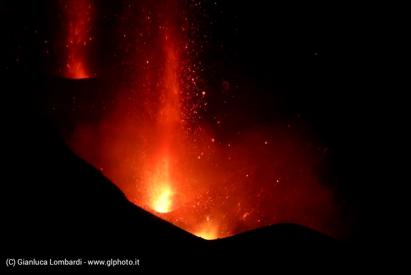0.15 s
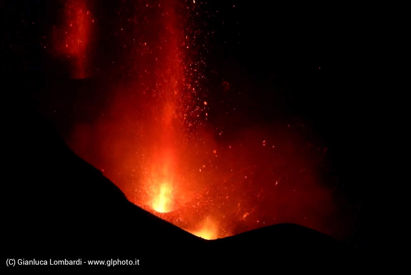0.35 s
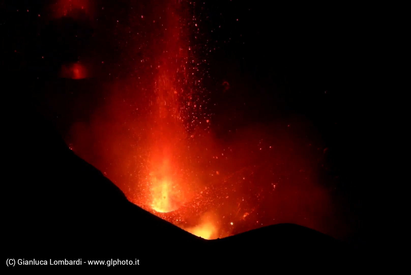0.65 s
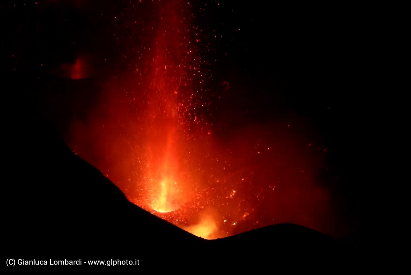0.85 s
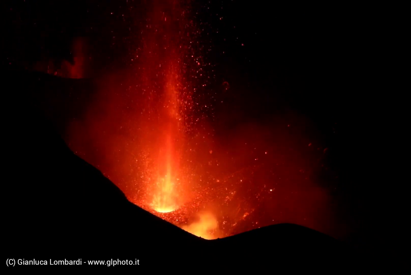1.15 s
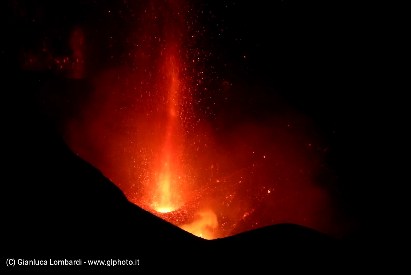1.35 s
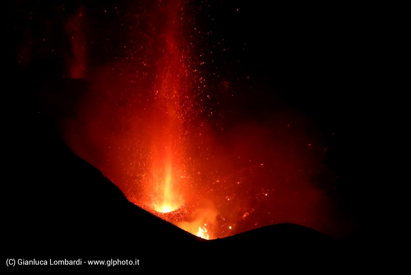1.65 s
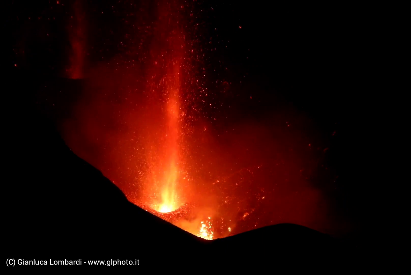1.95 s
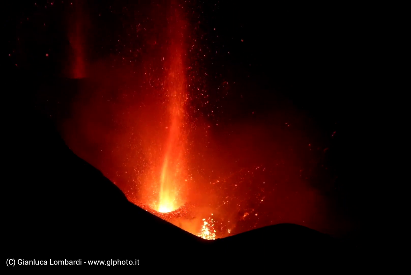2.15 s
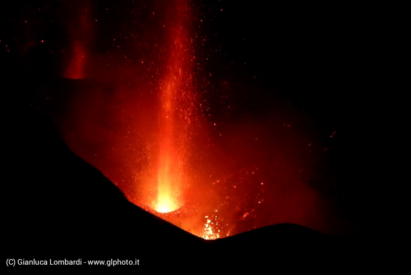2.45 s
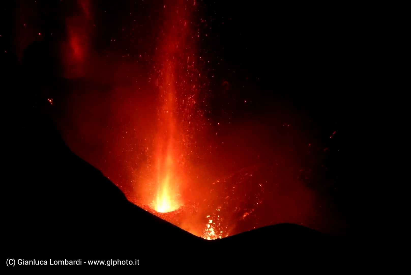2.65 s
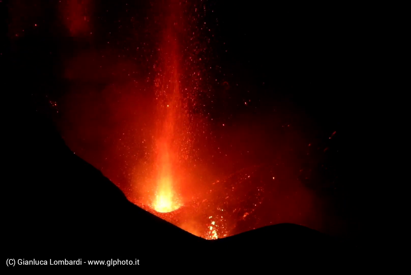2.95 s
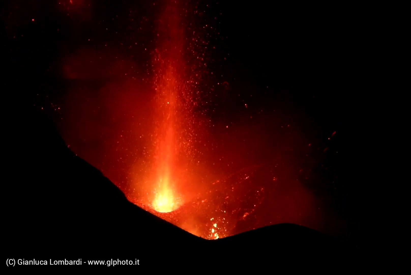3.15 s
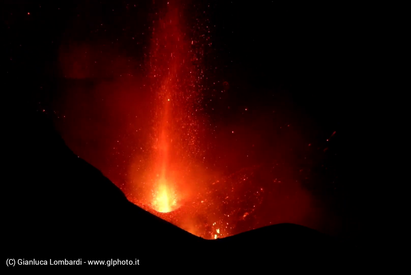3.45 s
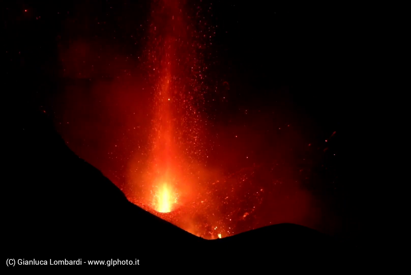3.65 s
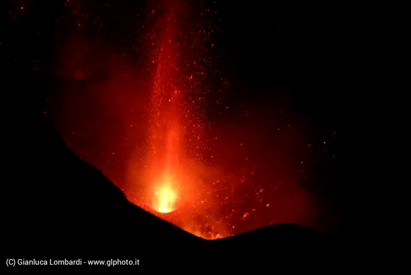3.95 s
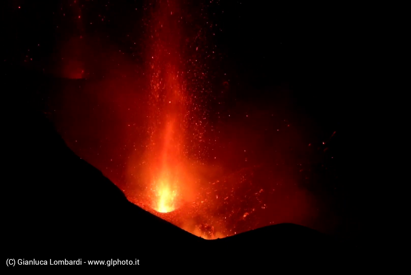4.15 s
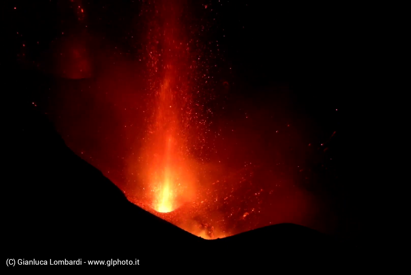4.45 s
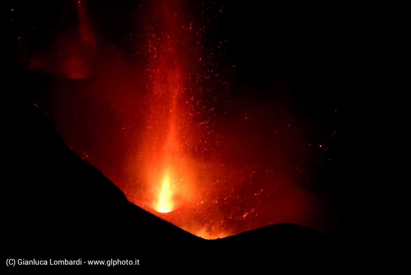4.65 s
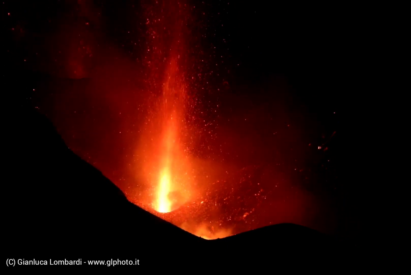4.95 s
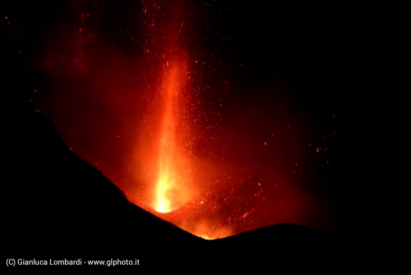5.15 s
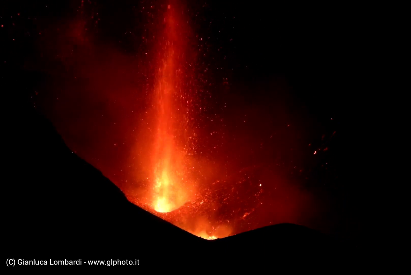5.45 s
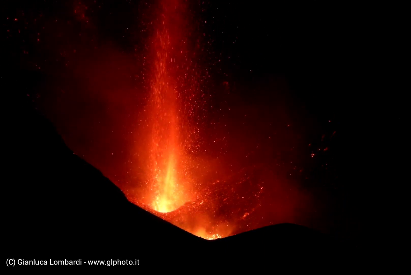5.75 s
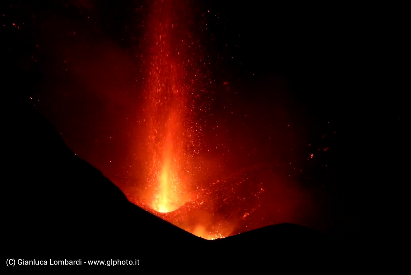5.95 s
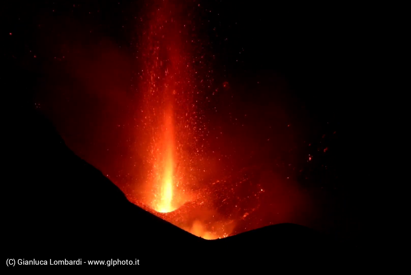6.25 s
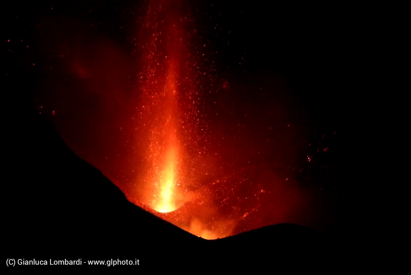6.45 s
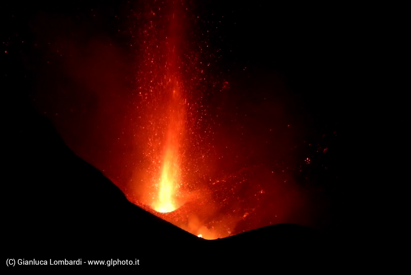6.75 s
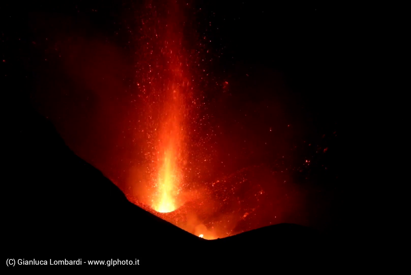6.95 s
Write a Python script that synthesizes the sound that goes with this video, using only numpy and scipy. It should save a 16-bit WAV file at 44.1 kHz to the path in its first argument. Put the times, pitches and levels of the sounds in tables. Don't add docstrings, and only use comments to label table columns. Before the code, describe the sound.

Outdoors at night, a distant volcanic vent jets gas in a continuous, dull, low roar. It starts subdued with a couple of soft bass thumps, then swells after about two seconds into a stronger, uneven rumble with rapid puffs. A faint steady hiss lies beneath. Close to the microphone, rare tiny ticks give way after five seconds to crisp, quiet crunching of sliding cinders.

```python
import sys
import numpy as np
from scipy import signal
from scipy.fft import rfft, irfft, next_fast_len
from scipy.io import wavfile
from scipy.ndimage import uniform_filter1d, map_coordinates

SR = 44100
rng = np.random.default_rng(int(sys.argv[2]) if len(sys.argv) > 2 else 0)


def how_loud(loudness_db):
    steps = np.asarray(loudness_db, float) / 20
    return 10 ** steps


def inscribe(sig):
    pcm = np.round(np.clip(np.atleast_2d(sig).T, -1, 1) * 32767)
    wavfile.write(sys.argv[1], SR, pcm.astype(np.int16))


N = 313992
ENVELOPE_S = np.arange(0, N + 32, 32) / SR


def unit(x):
    return x / np.sqrt(np.mean(x ** 2) + 1e-20)


def along(points, hz):
    point_hz, value = np.transpose(points)
    return np.interp(np.log(hz + 1), np.log(point_hz + 1), value)


def curves(rows):
    time_s, *columns = np.transpose(rows)
    return [np.interp(np.arange(N) / SR, time_s, column) for column in columns]


def wobble(rate_hz):
    return map_coordinates(rng.standard_normal(N // 100), [np.arange(N) * rate_hz / SR])


def swells(rows, half_width_s):
    total_db = sum(db * np.exp(-.5 * ((ENVELOPE_S - peak_s) / half_width_s) ** 2) for peak_s, db in rows)
    return curves(np.transpose([ENVELOPE_S, total_db]))[0]


def filtered(x, response):
    size = next_fast_len(N + 8192)
    return irfft(rfft(x, size) * response(np.fft.rfftfreq(size, 1 / SR)), size)[:N]


def above(hz, edge_hz):
    return 1 / (1 + (edge_hz / (hz + 1)) ** 8)


def path_gain(hz):
    # hz, density_db
    path = [(12, -23), (28, -21.5), (45, -13), (62, -4.5), (478, -8), (540, -7), (868, -11), (1080, -14),
            (1220, -12.5), (2030, -23), (2520, -31.5), (3250, -47.5), (4000, -68.5), (6000, -100)]
    # centre_hz, width_hz, ridge_db
    ridges = [(79.5, 7.5, 4), (113.8, 30, 4.5), (174.8, 32, 4.5), (223.2, 43, 8.5), (288, 45.5, 4.5),
              (349.3, 46, 6), (404, 34, 4)]
    ridges_db = sum(db * np.exp(-np.log(2) * (2 * (hz - centre_hz) / width_hz) ** 2)
                    for centre_hz, width_hz, db in ridges)
    return how_loud(along(path, hz) + ridges_db)


def turbulence(patchy_db):
    z = signal.stft(rng.standard_normal(N + SR), nperseg=1024)[2]
    field = uniform_filter1d(rng.standard_normal(z.shape), size=7, axis=0)
    field = uniform_filter1d(field, size=6, axis=1)
    return signal.istft(z * how_loud(patchy_db * unit(field)), nperseg=1024)[1][:N]


def eddies(share, patchy_db, flutter_db):
    sound = filtered(turbulence(patchy_db), lambda hz: path_gain(hz) * np.sqrt(share(hz)))
    return unit(sound * how_loud(flutter_db * wobble(18)))


def jet():
    handover_hz = [150, 550, 1400]
    # time_s, thrust_db, jet_speed (-1..1)
    thrust = [(0.0, -40, -1), (0.6, -38, 0.19), (1.2, -37.5, -0.27), (1.6, -34, -1.05), (2.4, -31, -1.16),
              (2.9, -29, -1.1), (3.3, -30, -0.94), (3.6, -27, -0.34), (4.6, -26, -0.41), (5.2, -26.5, 0.1),
              (6.2, -27.5, 0.94), (6.7, -26, 1), (7.12, -28, .4)]
    # peak_s, swell_db, brightness (-1 roar .. 1 edge)
    puffs = [(0.17, 1.5, 0.42), (0.58, 1, 0.16), (1.05, 1.2, 0.99), (1.48, 0.9, 1), (1.73, -0.2, -.3),
             (1.85, 0.8, -1.3), (2.17, 1, 0.25), (2.36, 1.3, -1.1), (2.5, 2.1, -0.61), (2.68, 1.5, -.8),
             (2.9, 2, 0.036), (3.05, 3, -0.22), (3.52, 3, -0.51), (3.61, 1.5, .4), (3.74, 0.5, -0.092),
             (3.93, 3, .1), (4.24, 3, -0.63), (4.42, 1.1, -.8), (4.61, 3, -0.56), (4.86, 1.7, -.2),
             (5.04, 3.5, -.1), (5.211, 0.75, -1.2), (5.33, 1.6, -0.57), (5.57, 2.2, 0.12),
             (5.98, 2.5, 0.74), (6.28, 0.8, 0.42), (6.46, 1.5, -0.86), (6.82, 3, -0.38), (6.92, 3.5, 0.37)]
    # peak_s, swell_db
    slugs = [(0.47, 8), (0.62, 11), (0.85, 4), (1.0, -4), (1.95, 1), (2.7, 4), (2.95, 1.5), (3.28, -4),
             (3.42, 6.5), (3.55, 5), (4.15, 2.5), (4.4, 0.5), (4.65, 1.5), (4.86, 4.5), (5.3, 1.5),
             (5.55, 2.5), (6.42, -5), (6.8, 4), (7.02, 7.5)]

    def puff_db(side):
        rows = [(peak_s, db * (1 + side * bright)) for peak_s, db, bright in puffs]
        return swells(rows, half_width_s=0.048)

    low_hz, mid_hz, high_hz = handover_hz
    boom = eddies(lambda hz: 1 - above(hz, low_hz), patchy_db=-1.3, flutter_db=-1.35)
    roar = eddies(lambda hz: above(hz, low_hz) - above(hz, mid_hz), patchy_db=0.65, flutter_db=0.48)
    rush = eddies(lambda hz: above(hz, mid_hz) - above(hz, high_hz), patchy_db=0.7, flutter_db=-0.16)
    edge = eddies(lambda hz: above(hz, high_hz), patchy_db=-0.26, flutter_db=-0.5)

    thrust_db, speed = curves(thrust)
    boom_db = -3 - 3 * speed + swells(slugs, half_width_s=0.046)
    roar_db = 4 - 0.1 * speed + puff_db(-1.2)
    edge_db = -8 + 1.1 * speed + puff_db(1)
    surge_db = 0.6 * wobble(9)
    fast = how_loud(surge_db) * (how_loud(puff_db(0)) * rush + how_loud(edge_db) * edge)
    return how_loud(thrust_db) * (how_loud(roar_db) * roar + how_loud(boom_db) * boom + fast)


def hiss():
    # hz, density_db
    floor = [(500, -20), (2500, 4), (3900, 1.5), (4600, -.5), (5500, -4.5), (6500, -1.5), (7200, -1),
             (8600, -5), (9800, -.5), (10700, 0), (13000, -1.6), (15500, -4), (20000, -8)]
    return how_loud(-64.5) * filtered(rng.standard_normal(N), lambda hz: how_loud(along(floor, hz)))


def crunch_gain(hz):
    # hz, density_db
    crunch = [(1500, -40), (3000, 5), (4200, 3), (5200, -1), (6000, -6), (6800, 0), (7800, -.5), (8400, -3),
              (10200, .5), (11800, -5), (13000, -12), (16000, -21), (20000, -60)]
    return how_loud(along(crunch, hz))


def cinder_ticks():
    # start_s, peak_db, dullness (0-1)
    ticks = [(0.2539, -53, 0), (2.1954, -54, 0), (3.5474, -53, .4), (3.598, -55, 0), (5.2289, -52, .2),
             (5.3069, -52, .3), (5.4008, -50, .3), (5.4207, -48, .7), (5.464, -47, .8), (5.4893, -48.5, .2),
             (5.9074, -51, .8), (5.968, -48, .9), (6.0442, -48, .6), (6.0899, -49, .3), (6.1083, -48, .3),
             (6.1324, -45, .8), (6.1453, -46, .4), (6.2144, -46.5, .2), (6.2225, -45.5, .3),
             (6.3057, -47.5, .7), (6.313, -44, .2), (6.4778, -43.5, .5), (6.4872, -42.5, .7),
             (6.5079, -43, .7), (6.5122, -39, .9), (6.5666, -50, .5), (6.6724, -53, .3), (6.9268, -51, .3),
             (7.0, -45, .3), (7.0247, -51, .3)]
    snaps = np.zeros(N)
    t = np.arange(SR // 400) / SR
    for start_s, peak_db, dull in ticks:
        snap = rng.standard_normal(len(t)) * how_loud(-60 * t / .001)
        snap = np.convolve(snap, [dull, 1, dull], 'same')
        snaps[round(start_s * SR):][:len(t)] += how_loud(peak_db + 9) * snap / np.linalg.norm(snap)
    return filtered(snaps, crunch_gain)


def slide_gains():
    # peak_s, level_db, rise_s and fall_s (per 10 dB), fine_db
    slides = [
        (5.4, -69.5, .3, .3, -1),
        (5.487, -61, .04, .05, 2.5),
        (5.75, -71, .3, .3, -2),
        (6.15, -62, .12, .08, 1),
        (6.24, -67, .06, .1, 1),
        (6.312, -64, .04, .035, -1),
        (6.455, -61.5, .05, .06, 1.5),
        (6.51, -61, .025, .03, -3),
        (6.75, -70.5, .5, .4, -2),
        (7.065, -62.5, .16, .2, 2),
    ]
    power = 0
    for peak_s, level_db, rise_s, fall_s, fine_db in slides:
        from_peak_s = ENVELOPE_S - peak_s
        drop_db = 10 * np.where(from_peak_s < 0, -from_peak_s / rise_s, from_peak_s / fall_s)
        grains_db = level_db + np.array([[0], [fine_db]])
        power = power + how_loud(grains_db - drop_db) ** 2
    return curves(np.transpose([ENVELOPE_S, *np.sqrt(power)]))


def cinder_slides():
    coarse_gain, fine_gain = slide_gains()
    size_db = 3 * rng.standard_normal(N)
    hit = rng.random(N) < .15
    contacts = hit * rng.standard_normal(N) * how_loud(size_db)
    grit = unit(filtered(contacts, crunch_gain))
    fine = filtered(grit, lambda hz: above(hz, 8600))
    return how_loud(2.2 + 1.5 * wobble(60)) * (coarse_gain * (grit - fine) + fine_gain * fine)


def scene():
    return (jet() + hiss() + cinder_ticks() + cinder_slides())[None]


def band_limit(x):
    return signal.sosfilt(signal.butter(12, 15730, fs=SR, output="sos"), x)


def record(dry):
    rounded = dry / (1 + np.abs(dry / .56) ** 5) ** (1 / 5)
    return band_limit(rounded)


dry = scene()
out = record(dry)
inscribe(out)
```